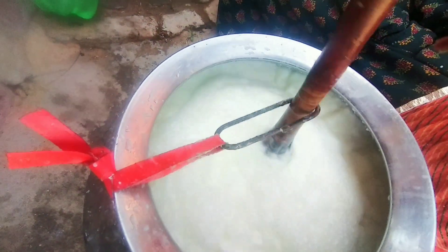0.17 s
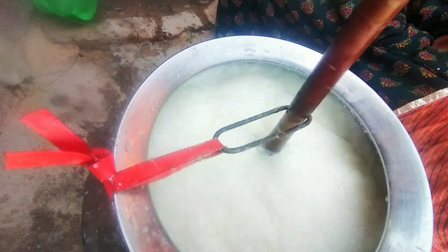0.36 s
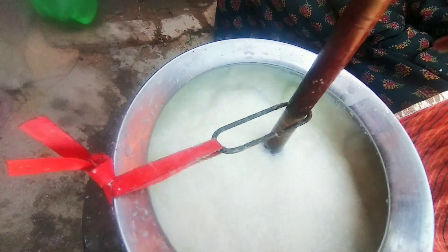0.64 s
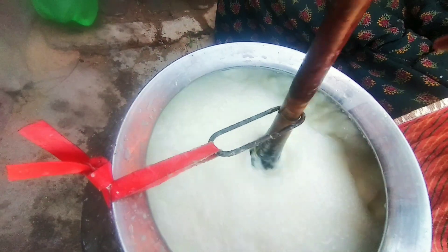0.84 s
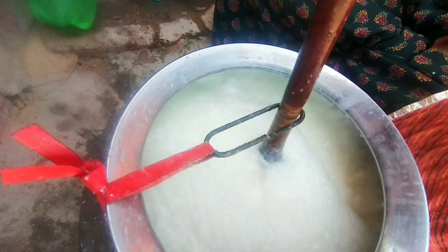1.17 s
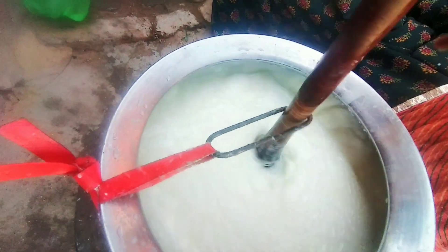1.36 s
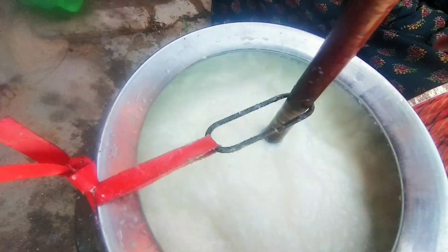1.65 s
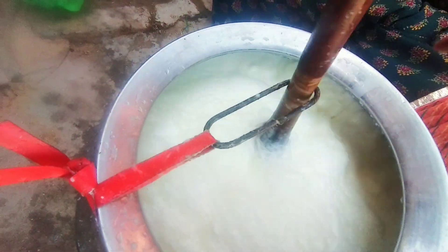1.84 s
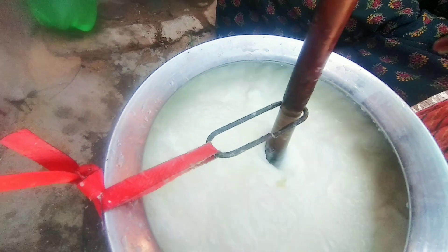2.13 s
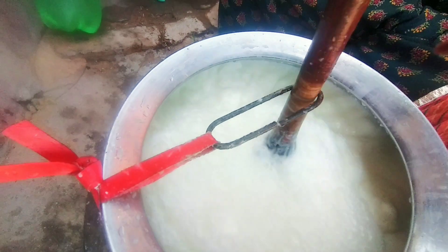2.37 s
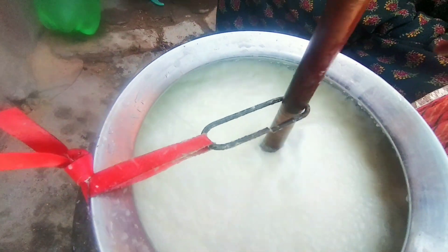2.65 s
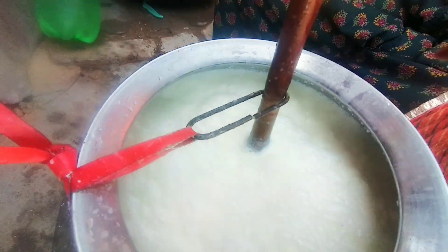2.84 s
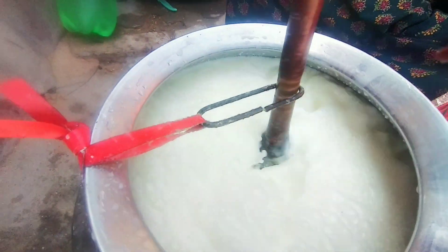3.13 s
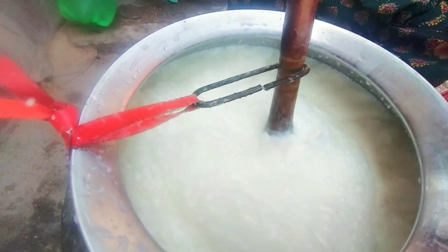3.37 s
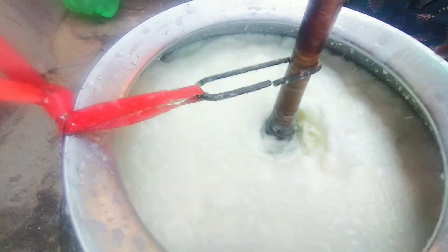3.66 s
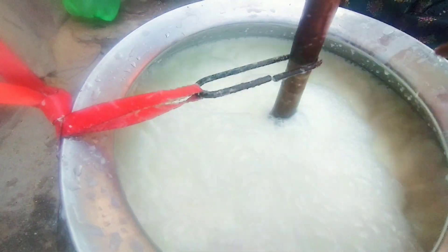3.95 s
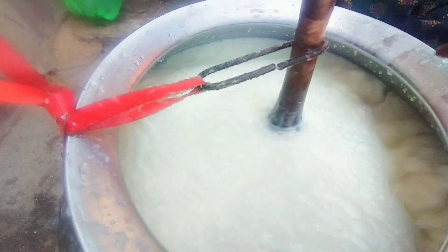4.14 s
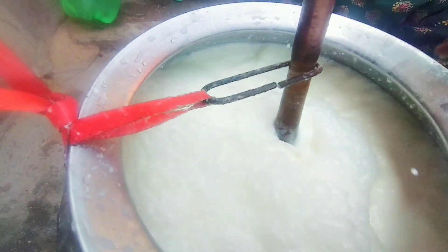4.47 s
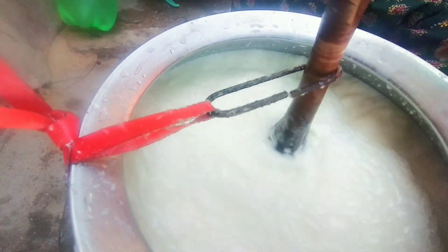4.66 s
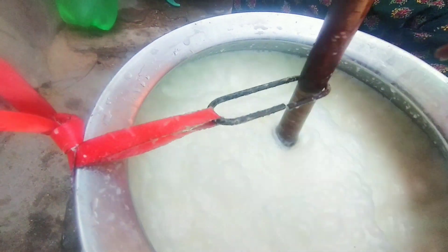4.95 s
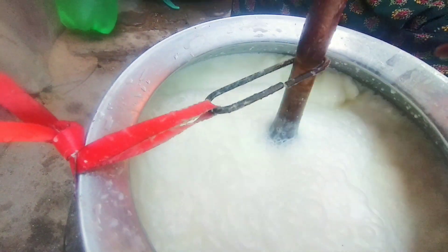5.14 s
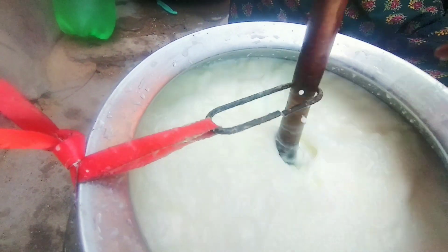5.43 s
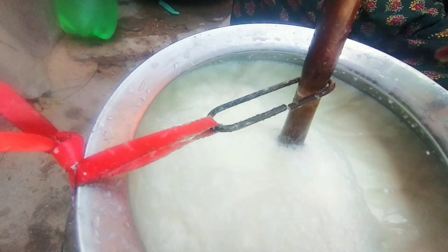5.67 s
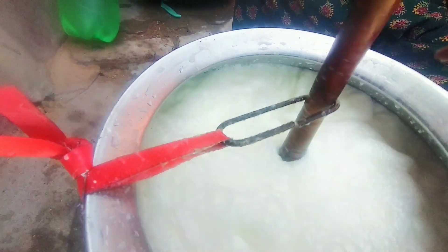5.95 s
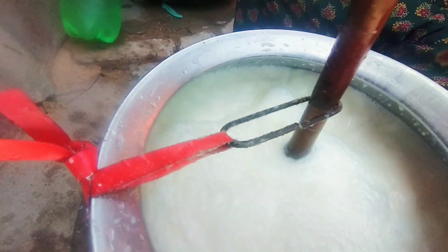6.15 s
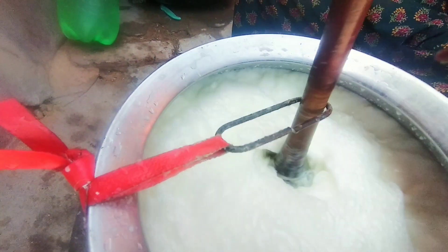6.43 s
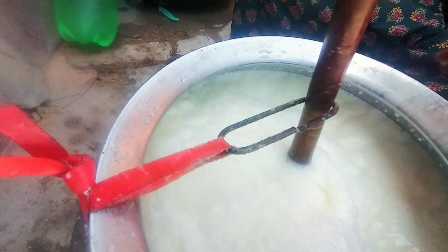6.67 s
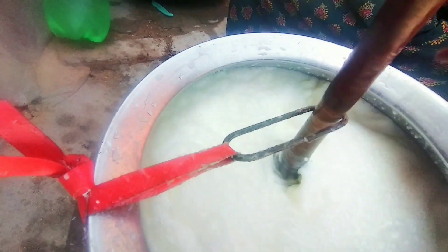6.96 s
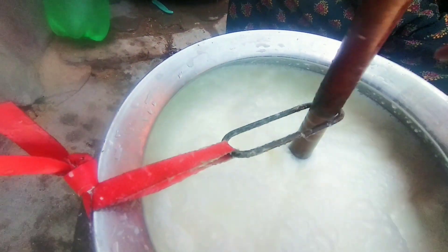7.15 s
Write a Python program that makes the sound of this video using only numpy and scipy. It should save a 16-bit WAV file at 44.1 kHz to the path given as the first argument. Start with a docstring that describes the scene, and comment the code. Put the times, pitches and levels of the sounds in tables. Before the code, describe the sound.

A stick churns thick curd in a metal pot, with rhythmic wet sloshes, hollow gurgles and small splashes heard close up.

```python
"""Curd is churned in a metal pot by a wooden stick that a rope spins one way, then the other.
Each pull tears the surface into splashes and foam and drags air under; every bubble is a damped
oscillator, lower the larger it is, and the air modes of the pot ring on after it.
Squelches, backsplashes, slaps, plops and flung drops stand out.
Air buffets a close pair of microphones in a quiet yard."""
import sys
import numpy as np
from scipy import signal
from scipy.fft import rfft, irfft
from scipy.io import wavfile

SR = 44100
rng = np.random.default_rng(int(sys.argv[2]) if len(sys.argv) > 2 else 0)


def wav_record(signal):
    """Record a signal, one row per channel, as 16-bit PCM in the file named by sys.argv[1]."""
    frames = np.transpose(np.atleast_2d(signal))
    bounded = np.clip(frames, -1, 1)
    # unit amplitude maps onto the largest positive 16-bit level
    quanta = np.round(bounded * 32767).astype(np.int16)
    wavfile.write(sys.argv[1], SR, quanta)


N = 321930
TIME = np.arange(N) / SR
STEPS = TIME[::64]  # coarse time axis for slow envelopes


def gain_of(db):
    """The decibel law: 20 dB is a factor of ten in amplitude."""
    return 10 ** (np.asarray(db) / 20)

def unit_rms(x):
    """Power normalisation: the mean of the channels gets an rms of 1."""
    return x / np.sqrt(np.mean(np.atleast_2d(x).mean(0) ** 2) + 1e-20)

def value_at(points, hz):
    """Interpolation of a table on a logarithmic frequency axis."""
    freq_hz, value = np.transpose(points)
    return np.interp(np.log(hz + 1), np.log(freq_hz + 1), value)

def add(mix, start_s, sound):
    """Superposition: a sound joins the stereo mix at start_s."""
    part = mix[:, max(round(start_s * SR), 0):][:, :sound.shape[1]]
    part += sound[:, :part.shape[1]]

def colour(x, spectrum, size=4096):
    """Minimum-phase filtering: each spectral peak rings after the blow, never before."""
    log_gain = np.log(gain_of(value_at(spectrum, abs(np.fft.fftfreq(size, 1 / SR)))))
    taps = np.fft.ifft(np.exp(np.conj(signal.hilbert(log_gain)))).real[:size // 2]
    return signal.oaconvolve(x, taps[None], axes=1)[:, :x.shape[1]]

def spurts(depth_db, every_s):
    """Random amplitude modulation: curd and air both move unevenly."""
    wander = np.clip(rng.standard_normal(N), -2, 2)
    return unit_rms(gain_of(depth_db * np.interp(TIME, np.arange(N) * every_s, wander)))

def swells(rows, column):
    """A sum of Gaussian envelopes; each row holds centre_s, half_width_s, then levels."""
    bells = (gain_of(row[column]) * np.exp(-((STEPS - row[0]) / row[1]) ** 2) for row in rows)
    return np.interp(TIME, STEPS, sum(bells))

def stereo_noise(spectrum, apart):
    """Partial coherence: one noise common to both microphones, plus one of its own for each."""
    shared, left, right = rng.standard_normal((3, N))
    return unit_rms(colour(shared + apart * np.array([left, right]), spectrum))

# response of the left microphone relative to the right: freq_hz, difference_db
MIC_BALANCE = [(60, -1), (300, -0.5), (400, 0.5), (530, 0), (630, -2), (790, -4.5), (1000, 0), (1350, -2.5),
               (1900, -1.5), (2400, 1.5), (4500, 2), (7200, 1.5), (9800, -21), (15000, -7)]
def microphones(x):
    """Level difference at constant total power: the left side hears little of the top treble."""
    ratio = gain_of(value_at(MIC_BALANCE, np.fft.rfftfreq(2 * N, 1 / SR)))
    response = np.array([ratio, np.ones_like(ratio)]) * np.sqrt(2 / (1 + ratio ** 2))
    return irfft(rfft(x, 2 * N) * response)[:, :N]

# spectrum of the quiet yard: freq_hz, relative_db
YARD_SPECTRUM = [(15, -30), (45, 17.5), (100, -10), (500, -10.5), (1000, 5), (2000, -17.5), (3500, -20),
                 (6500, -19), (10000, -29.5), (12500, -33), (15800, -45)]
def yard():
    """A diffuse field: faint steady noise, almost uncorrelated between the microphones."""
    return gain_of(-49) * stereo_noise(YARD_SPECTRUM, apart=6.9)

# gusts on the microphones: centre_s, level_db
GUSTS = [(0.06, -35), (0.16, -35), (0.44, -36), (1.04, -38), (1.48, -28), (3.24, -43), (3.47, -36),
         (3.98, -37), (4.38, -35), (4.59, -33), (4.82, -34), (5.11, -30.5), (5.41, -37), (5.53, -31.5),
         (5.64, -29.5), (5.72, -31), (6.92, -29), (7.05, -32), (7.27, -35)]
def buffet(gust_half_width_s=0.039):
    """Turbulent pressure on the microphones: a low breeze that swells after each pull, and gusts."""
    sway = unit_rms(churning(GURGLE_COLUMN, lag_s=0.069, rise_db_per_s=145, fall_db_per_s=60,
                             slosh_db=-15, settle_db_per_s=16))
    breeze = gain_of(-41) * sway ** 0.49 * spurts(depth_db=3.5, every_s=0.055)
    gusts = sum(gain_of(db) * np.exp(-((TIME - s) / gust_half_width_s) ** 2) for s, db in GUSTS)
    rumble = [(10, -19), (25, -7), (42, -13.5), (56, 1), (72, -11), (95, -10.5), (160, -30), (500, -76)]
    return np.hypot(breeze, gusts) * stereo_noise(rumble, apart=0.43)

# air modes above the curd: freq_hz, bandwidth_hz, gain_db
POT_MODES = [(463, 110, -12.5), (633, 29, -10.5), (784, 55, -11.5), (1384, 53, -30), (1478, 20, -7),
             (1980, 120, -20)]
def hollow(x):
    """Cavity resonance: the air in the pot adds its ringing to the direct sound."""
    return x + sum(gain_of(db) * signal.lfilter(*signal.iirpeak(hz, hz / width_hz, SR), x)
                   for hz, width_hz, db in POT_MODES)

def bubble(hz, cycles, glide, swell_cycles=0.2):
    """A damped oscillator, as a complex wave: the pitch rises as the bubble nears the surface."""
    turns = np.arange(int(5 * cycles * SR / hz) + 4) * hz / SR
    age = turns / cycles
    envelope = (1 - np.exp(-turns / swell_cycles)) * np.exp(-age)
    return envelope / envelope.max() * np.exp(2j * np.pi * turns * (1 + glide * age / 2))

# likeness of the two microphone signals: freq_hz, coherence
MIC_COHERENCE = [(40, .65), (100, 0.95), (150, 0.93), (240, 0.9), (480, 1), (650, 0.97), (850, 0.7),
                 (1200, 0.13), (1450, 0.82), (2000, 0.66), (2500, 0.31), (3300, 0.89), (5000, 0.18),
                 (8000, 0.06)]
# phase by which the left microphone leads: freq_hz, lead_rad
MIC_LEAD = [(350, 0.019), (650, -0.27), (770, 0.69), (870, 1.36), (1150, -1.43), (1400, 0.54),
            (2200, -0.13), (2700, -1), (4500, -0.26), (7000, -0.64)]
def swarm(effort, spectrum, low_hz, high_hz, per_s, cycles, glide, spread_db, crowding, bands=20):
    """Incoherent sum of bubbles in the pot: more effort makes them more frequent and louder."""
    cumulative_rate = np.cumsum(effort ** crowding)
    per_band = int(per_s * N / SR / bands)
    out = np.zeros((2, N))
    for hz in np.geomspace(low_hz, high_hz, bands):
        when, strength, phase, place = rng.random((12000, 4))[:per_band].T
        onsets = np.searchsorted(cumulative_rate, when * cumulative_rate[-1])
        excess_db = spread_db * np.minimum(-np.log(1 - strength), 3.5)
        amplitude = gain_of(excess_db) * effort[onsets] ** (1 - crowding / 2)
        # each bubble lies at its own place, so its phase differs between the microphones
        scatter_rad = np.pi * (1 - np.clip(value_at(MIC_COHERENCE, hz), 0, 1)) ** .66
        shift_rad = scatter_rad * (2 * place - 1) - value_at(MIC_LEAD, hz)
        births = np.zeros((2, N), complex)
        births[:, onsets] = amplitude * np.exp(2j * np.pi * phase + 1j * np.outer([0, 1], shift_rad))
        band = signal.oaconvolve(births, bubble(hz, cycles, glide)[None], axes=1)[:, :N].real
        out += np.sqrt(hz) * unit_rms(band)
    return unit_rms(hollow(colour(out, spectrum))) * np.sqrt(np.mean(effort ** 2))

# flung drops and bursting foam: start_s, level_db, pitch_hz
FLUNG_DROPS = [(0.296, -31, 6160), (0.6046, -37, 3160), (0.7583, -38, 5040), (1.043, -27, 3840),
               (1.176, -36, 5660), (1.4128, -29, 3360), (1.5956, -26, 3420), (2.7802, -19.5, 3280),
               (2.786, -19.5, 6140), (2.8424, -34, 3560), (3.53, -37.5, 7300), (3.5654, -39, 3070),
               (3.645, -30, 7050), (3.891, -30, 3620), (3.965, -38, 4940), (4.0894, -26, 8350),
               (4.1086, -30.5, 5100), (4.137, -39, 5500), (4.337, -25, 3270), (4.3917, -31, 4230),
               (4.9823, -32, 3300), (5.463, -34, 3260), (5.857, -22, 4510), (6.0686, -38, 5000),
               (6.7444, -42, 3240)]
def drops(decay_s=0.0034):
    """Impact and bubble resonance: a wet tick and a tiny ring; larger drops sound lower."""
    out, t = np.zeros((2, N)), np.arange(900) / SR
    for start_s, level_db, hz in FLUNG_DROPS:
        burst = rng.standard_normal((2, len(t))) * np.exp(-t / decay_s)
        tick = colour(burst, [(hz / 4, -22), (hz * 0.77, 0), (9500, -2), (12000, -12), (16000, -20)])
        ring = (bubble(hz, cycles=9, glide=0.022) * np.exp(1j * rng.normal(0, 1, (2, 1)))).real
        drop = 0.22 * tick / abs(tick).max()
        add(drop, 0, 0.16 * ring)
        add(out, start_s, gain_of(level_db) * drop / abs(drop.mean(0)).max())
    return out

# air pockets that come up alone: start_s, level_db, pitch_hz
LONE_BUBBLES = [(0.55, -16.5, 428), (1.367, -30.5, 2540), (1.786, -21, 420), (1.929, -30, 1800),
                (2.293, -25, 493), (2.423, -20, 447), (2.756, -17.5, 490), (2.89, -29, 470),
                (2.943, -29, 504), (3.489, -23.5, 496), (4.687, -31, 1300), (4.757, -18, 1530),
                (5.16, -25, 533), (5.175, -25.5, 307), (5.2, -29.5, 1350), (5.235, -31, 1810),
                (5.29, -28, 1080), (5.795, -28, 1940), (6.713, -23, 520)]
def plops(reference_hz=460):
    """Resonance scales with size: large bubbles plop, small ones chirp for more cycles."""
    out = np.zeros((2, N))
    for start_s, level_db, hz in LONE_BUBBLES:
        smallness = hz / reference_hz
        plop = bubble(hz, cycles=1.9 * smallness ** .5, glide=0.026 * smallness ** .9, swell_cycles=1.2)
        add(out, start_s, gain_of(level_db) * plop.imag[None])
    return out

# closings of the hole beside the stick: centre_s, half_width_s, bright_db, throaty_db
CLOSINGS = [(0.355, .015, -42, -28), (0.425, .03, -32, -32.5), (0.878, .014, -30, -33),
            (1.49, .02, -34, -31), (2.03, .015, -33, -27), (2.62, .06, -31.5, -31), (3.17, .04, -36, -31),
            (3.71, .018, -38, -26.5), (4.25, .03, -32, -33), (4.82, .03, -39, -29), (5.965, .02, -27, -29),
            (6.48, .025, -40, -30), (7.06, .04, -32, -28)]
# spectra of their small and their larger bubbles: freq_hz, relative_db
BRIGHT_SPECTRUM = [(1800, -13), (2400, 3), (3000, 0), (3600, -5), (4600, -15.5)]
THROATY_SPECTRUM = [(1100, -13.5), (1400, 2.5), (1900, -0.5), (2400, -11.5)]
def squelch():
    """Cavity collapse: the hole beside the stick closes on a burst of bubbles."""
    bright = swarm(swells(CLOSINGS, column=2), BRIGHT_SPECTRUM, 2030, 4260,
                   per_s=900, cycles=7, glide=0.046, spread_db=1, crowding=.6, bands=10)
    throaty = swarm(swells(CLOSINGS, column=3), THROATY_SPECTRUM, 1294, 2216,
                    per_s=300, cycles=8.8, glide=0.044, spread_db=2.5, crowding=.6, bands=8)
    return bright + throaty

# lumps of curd meeting the paddle: start_s, level_db, wet_over_thud_db
PADDLE_SLAPS = [(0.343, -10, -15), (0.872, -11.5, 3), (0.95, -6, -9), (2.024, -8, 16), (2.121, -9, -16),
                (2.618, -10, -7), (3.244, -9, -20), (3.698, -8, -8), (4.281, -11.5, 0), (4.306, -11.5, -19),
                (5.465, -13.5, -24), (5.946, -8.5, -6), (6.496, -11, 6), (7.076, -14, 5), (7.086, -11, -5)]
def slaps(decay_s=0.0039):
    """Impulsive excitation: a short blow gives a thud and a wet smack, and the pot answers."""
    out, t = np.zeros((2, N)), np.arange(2500) / SR
    for start_s, level_db, wet_db in PADDLE_SLAPS:
        blow = rng.standard_normal((1, len(t))) * np.exp(-t / decay_s)
        smack = hollow(colour(blow, POT_SPECTRUM) + gain_of(wet_db) * colour(blow, SPLASH_SPECTRUM))
        add(out, start_s, gain_of(level_db) * smack / abs(smack).max())
    return out

# thrown curd falling back: centre_s, half_width_s, splash_db, spray_db
FALLING_CURD = [(0.538, 0.025, -31.5, -42.5), (1.01, 0.032, -41.5, -39.5), (1.587, 0.02, -31.5, -41.0),
                (1.657, 0.033, -39.0, -44.5), (2.119, 0.03, -30.0, -38.5), (2.775, 0.051, -34.0, -39.0),
                (3.833, 0.022, -37.0, -38.0), (3.895, 0.019, -40.5, -41.5), (4.358, 0.038, -38.5, -40.5),
                (4.932, 0.007, -30.5, -36.0), (4.988, 0.027, -32.5, -35.5), (5.467, 0.011, -37.0, -42.5),
                (6.06, 0.017, -33.5, -45.0), (7.187, 0.042, -30.5, -44.0)]
def with_backsplashes(effort, column):
    """Independent sources add in power: falling curd joins the envelope of the pulls."""
    return np.hypot(effort, swells(FALLING_CURD, column))

# spectrum of the foam: freq_hz, relative_db
SPRAY_SPECTRUM = [(1500, -10.5), (2500, 4), (3200, 1.5), (4200, -1), (5000, -3.5), (6000, -2.5),
                  (7500, -7.5), (10000, -10.5), (11200, -17), (12500, -26), (15800, -27)]
# slow drift of its top treble: time_s, gain_db
SPRAY_TREBLE = [(.4, 0.5), (2.0, 2), (3.1, -2.5), (4.3, 1.6), (7.3, 0)]
def spray(fizz_share=0.33, treble_hz=6500):
    """Small bubbles resonate high: at full spin foam crackles, droplets ping, the finest blur to fizz."""
    effort = churning(SPRAY_COLUMN, lag_s=-.01, rise_db_per_s=470, fall_db_per_s=330,
                      slosh_db=-47, settle_db_per_s=62, hold_column=2, slosh_lag_s=.03)
    effort = with_backsplashes(effort, column=3)
    crackle = swarm(effort, SPRAY_SPECTRUM, 2250, 13800,
                    per_s=5500, cycles=3, glide=0.0092, spread_db=3.5, crowding=.35)
    pings = swarm(effort, SPRAY_SPECTRUM, 2600, 11000,
                  per_s=450, cycles=16, glide=.04, spread_db=3.6, crowding=.3, bands=24)
    fizz = effort * stereo_noise(SPRAY_SPECTRUM, apart=2)
    foam = np.sqrt(1 - fizz_share) * crackle + np.sqrt(fizz_share) * fizz + .62 * pings
    foam *= spurts(depth_db=2.1, every_s=.009)
    treble = signal.sosfiltfilt(signal.butter(2, treble_hz, "high", fs=SR, output="sos"), foam)
    treble_gain = gain_of(np.interp(TIME, *np.transpose(SPRAY_TREBLE)))
    return gain_of(-0.1) * (foam - treble + treble * treble_gain)

# spectrum of the splash under the rim: freq_hz, relative_db
SPLASH_SPECTRUM = [(500, -30), (850, -9.5), (1080, -19), (1270, -5.5), (1380, -1.5), (1650, -3),
                   (1950, -1.5), (2300, -8), (2800, -17), (4000, -27), (8000, -50), (15000, -65)]
def splash():
    """Air entrainment: the torn surface closes over many quickly damped bubbles and a few that ring."""
    effort = churning(SPLASH_COLUMN, lag_s=-.003, rise_db_per_s=299, fall_db_per_s=230,
                      slosh_db=-30, settle_db_per_s=45)
    effort = with_backsplashes(effort, column=2)
    damped = swarm(effort, SPLASH_SPECTRUM, 701, 4570,
                   per_s=3300, cycles=3.1, glide=0.053, spread_db=2.5, crowding=.45)
    ringing = swarm(effort, SPLASH_SPECTRUM, 1300, 4400,
                    per_s=420, cycles=13, glide=.05, spread_db=3, crowding=.6, bands=30)
    return gain_of(-2.5) * spurts(depth_db=1, every_s=0.016) * (damped + 0.52 * ringing)

# spectrum of the hollow of the pot: freq_hz, relative_db
POT_SPECTRUM = [(60, -16), (110, -13), (160, -2.5), (200, -5.5), (235, -10), (330, -10), (410, -5),
                (480, -2.5), (560, -5), (660, -8.5), (790, -12), (1000, -21), (1500, -24.5), (12000, -90)]
def gurgle():
    """Heavily damped resonance: air dragged under bubbles in thick curd, the deepest pockets later."""
    near_top = churning(GURGLE_COLUMN, lag_s=.018, rise_db_per_s=133, fall_db_per_s=167,
                        slosh_db=-23.5, settle_db_per_s=32.5)
    far_down = churning(DEEP_COLUMN, lag_s=0.04096, rise_db_per_s=103.5, fall_db_per_s=99.5,
                        slosh_db=-32, settle_db_per_s=28.5)
    upper = swarm(near_top, POT_SPECTRUM, 270, 1395,
                  per_s=1900, cycles=2.26, glide=0.028, spread_db=2.5, crowding=.7)
    deep = swarm(far_down, POT_SPECTRUM, 110, 256.5,
                 per_s=600, cycles=1.87, glide=0.033, spread_db=2, crowding=.5, bands=8)
    return gain_of(-0.08) * upper + gain_of(-0.74) * deep

# pulls of the rope:
# start_s, full_spin_s, spraying_s, gurgle_db, splash_db, spray_db, deep_db, slosh_offset_db
ROPE_PULLS = [(-0.247, 0.102, 0.061, -21.0, -24.5, -38, -25.5, 0.5),
              (0.309, 0.137, 0.163, -22.5, -25.0, -36.0, -31.5, -5.0),
              (0.881, 0.071, 0.085, -25.5, -24.5, -33.0, -34.5, 1.0),
              (1.42, 0.082, 0.127, -21.5, -26.0, -33.5, -36.5, -1.0),
              (1.995, 0.057, 0.08, -26.0, -23.5, -32.5, -38.5, 2.5),
              (2.534, 0.1, 0.16, -20.5, -22.0, -31.0, -31.5, -1.5),
              (3.109, 0.095, 0.142, -22.0, -27.0, -30.0, -34.0, 1.5),
              (3.655, 0.126, 0.151, -22.5, -28.0, -33.5, -31.5, -0.5),
              (4.232, 0.055, 0.089, -24.0, -23.0, -31.0, -36.5, 1.5),
              (4.772, 0.075, 0.121, -20.5, -22.0, -33.0, -31.5, -0.0),
              (5.333, 0.019, 0.083, -27.5, -35.5, -38.5, -31.0, 2.5),
              (5.872, 0.083, 0.117, -21.0, -22.5, -31.0, -31.0, -1.0),
              (6.444, 0.057, 0.098, -27.5, -24.0, -34.5, -35.0, 1.0),
              (6.991, 0.092, 0.17, -20.5, -21.0, -32.5, -30.5, -1.5)]
GURGLE_COLUMN, SPLASH_COLUMN, SPRAY_COLUMN, DEEP_COLUMN = 3, 4, 5, 6
def churning(column, lag_s, rise_db_per_s, fall_db_per_s, slosh_db, settle_db_per_s,
             hold_column=1, slosh_lag_s=0):
    """Forced motion, then free decay: a layer's envelope rises with each pull and leaves a slosh."""
    arch_db, build_db_per_s = 2.5, 92
    turn_lead_s, turn_half_width_s, turn_dip_db = .1, .112, 8
    power, turning = np.zeros((2, len(STEPS)))
    for pull in ROPE_PULLS:
        start_s, hold_s, level_db, slosh_offset_db = pull[0], pull[hold_column], pull[column], pull[-1]
        since_start = STEPS - start_s - lag_s
        since_end = since_start - hold_s
        spin = np.minimum(since_start * rise_db_per_s, -since_end * fall_db_per_s).clip(max=0)
        spin += arch_db * (np.sin(np.pi * np.clip(since_start / hold_s, 0, 1)) - .5)
        build = (since_start - slosh_lag_s) * build_db_per_s
        slosh = np.minimum(build, -since_end * settle_db_per_s).clip(max=0)
        power += gain_of(level_db + spin) ** 2 + gain_of(slosh_db + slosh_offset_db + slosh) ** 2
        # before each pull the stick stops to turn round, and the curd goes quieter
        turning += np.exp(-((STEPS - start_s + turn_lead_s) / turn_half_width_s) ** 2)
    return np.interp(TIME, STEPS, np.sqrt(power) * gain_of(-turn_dip_db * turning))

def scene():
    """Superposition at the microphones: the churn, close by, over the breeze and the yard."""
    curd = gurgle() + splash() + spray() + drops() + slaps() + plops() + squelch()
    return microphones(curd + buffet() + yard())

def record(dry):
    """Band limiting: a steep linear-phase low-pass removes the highest treble."""
    cutoff_hz = 15830
    taps = signal.firwin(1023, cutoff_hz, window=("kaiser", 9), fs=SR)
    return signal.oaconvolve(dry, taps[None], "same")


dry = scene()
out = record(dry)
wav_record(out)
```